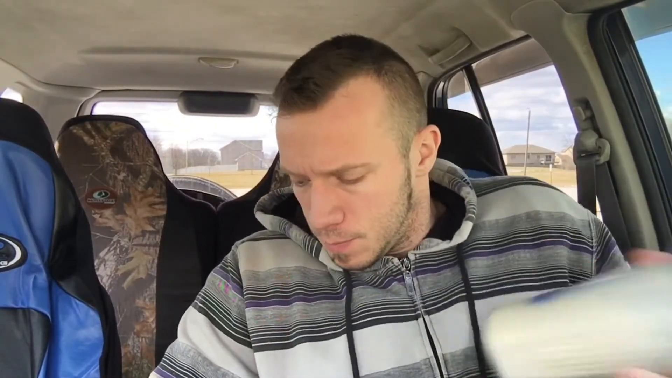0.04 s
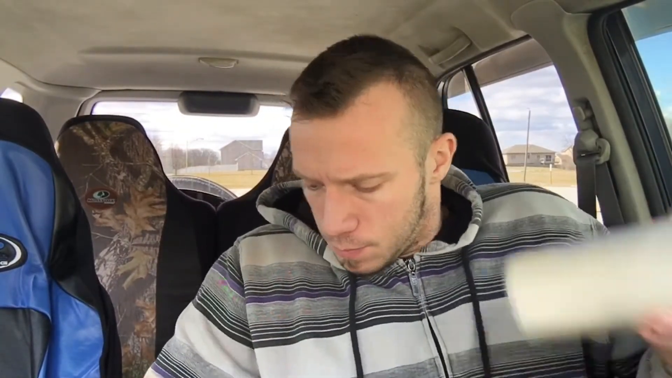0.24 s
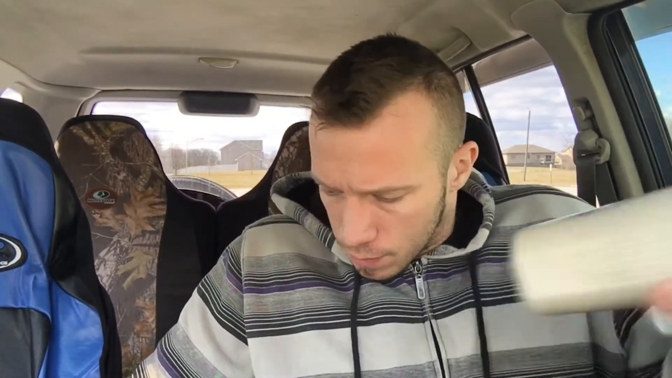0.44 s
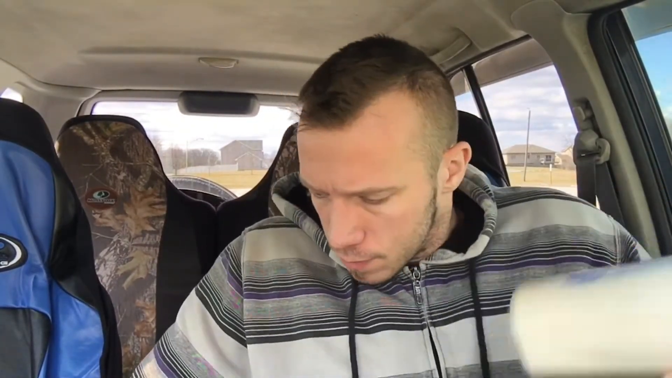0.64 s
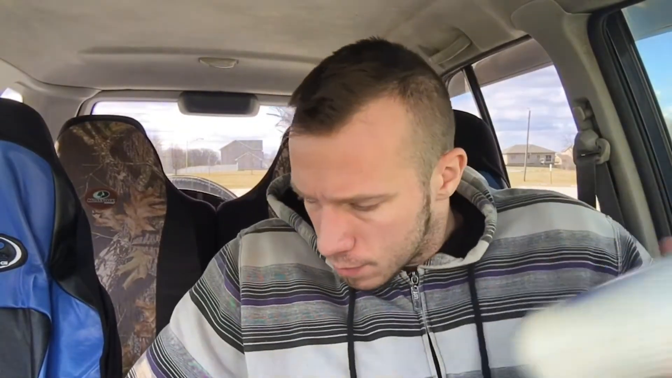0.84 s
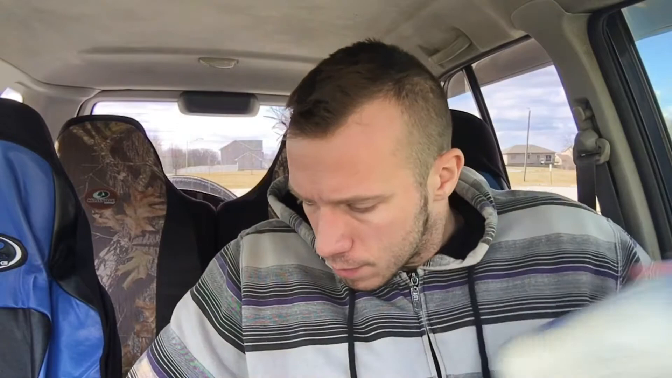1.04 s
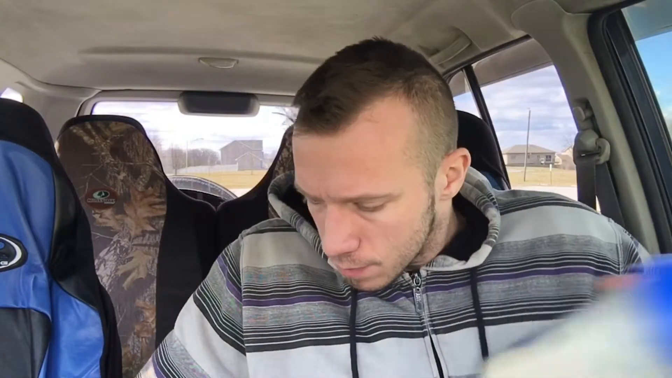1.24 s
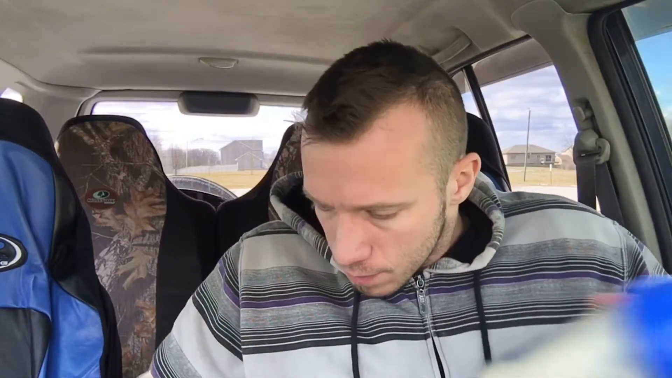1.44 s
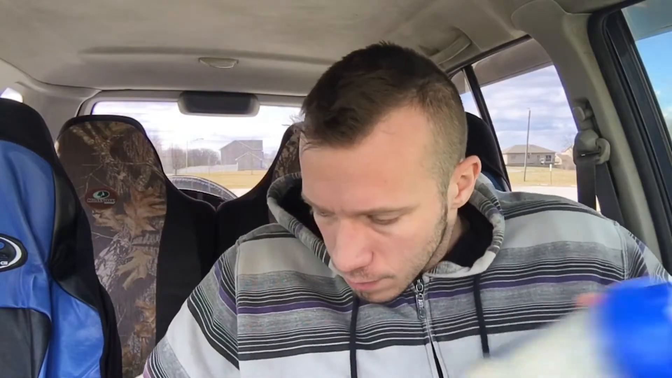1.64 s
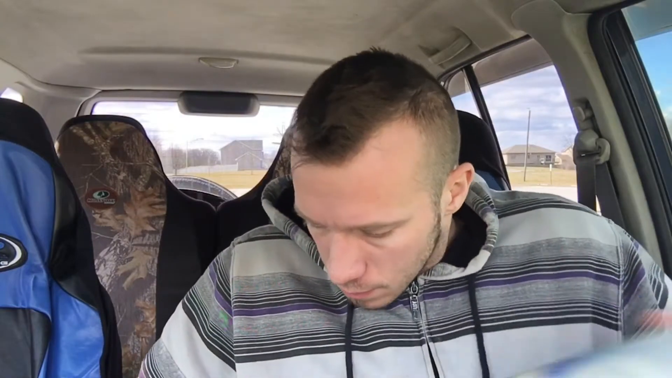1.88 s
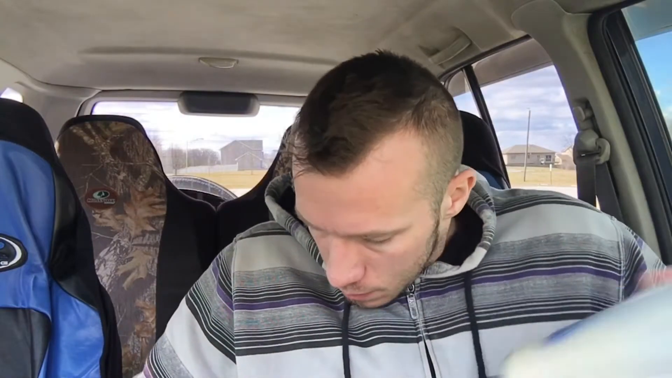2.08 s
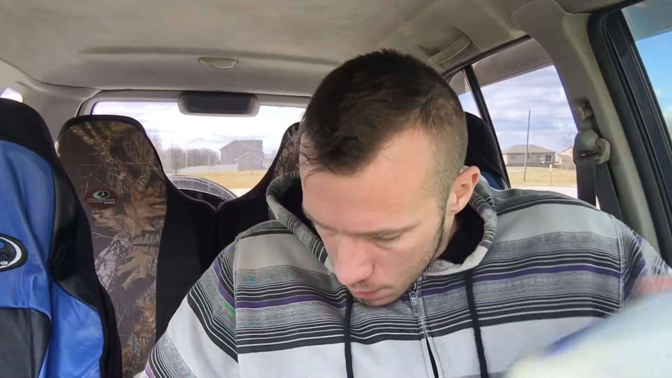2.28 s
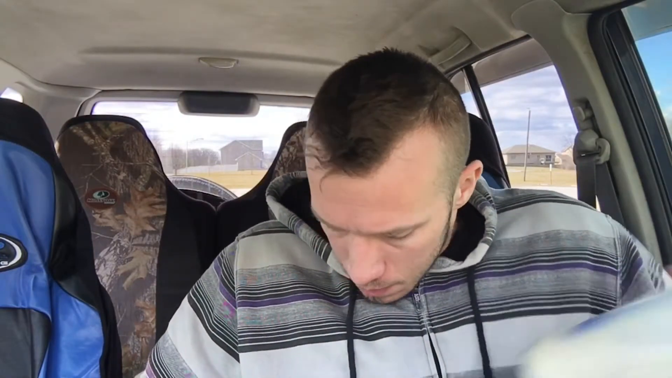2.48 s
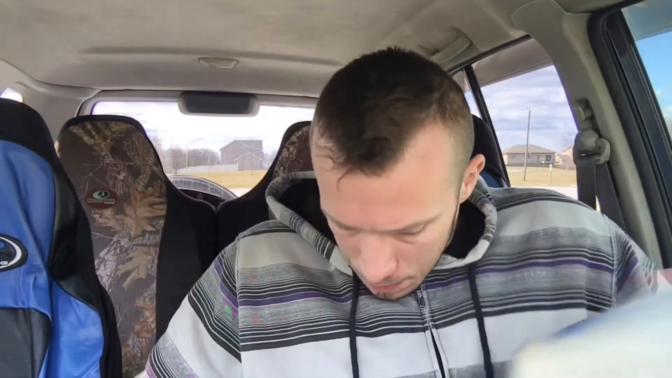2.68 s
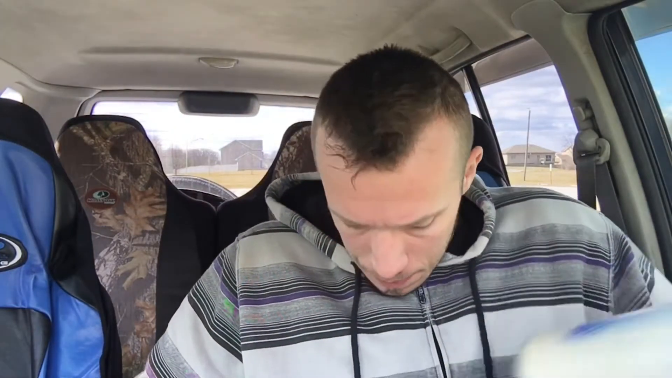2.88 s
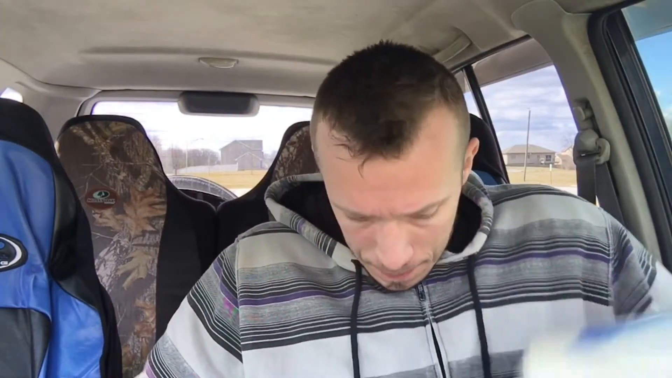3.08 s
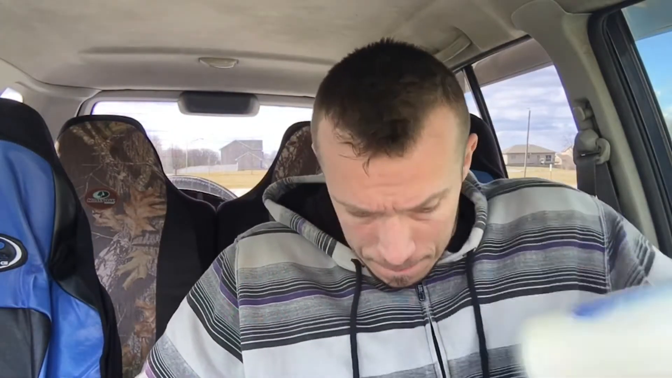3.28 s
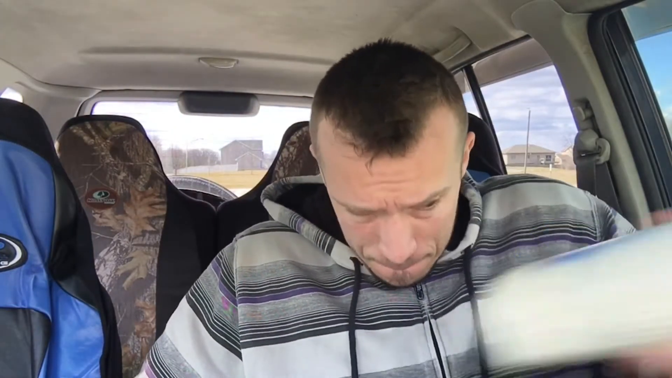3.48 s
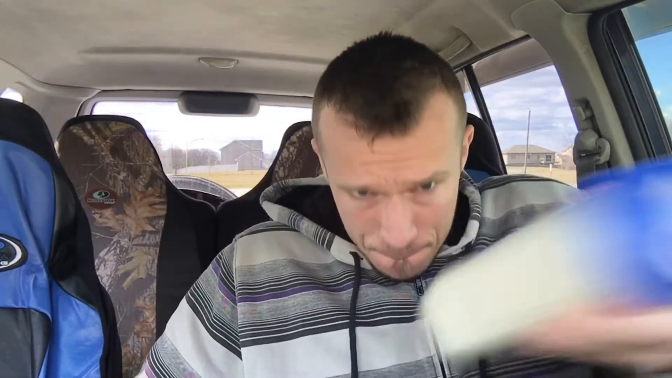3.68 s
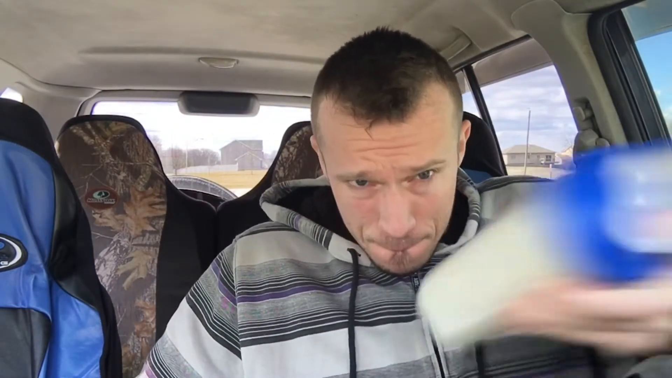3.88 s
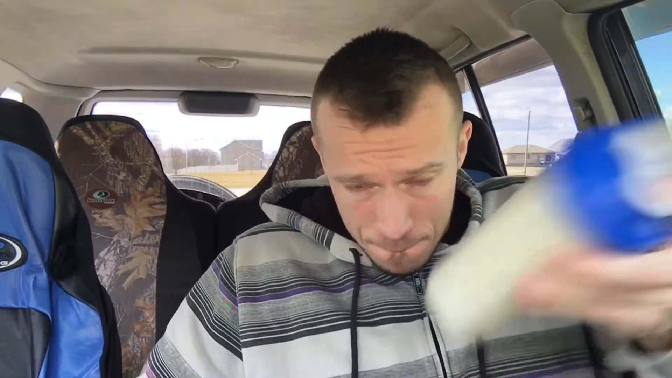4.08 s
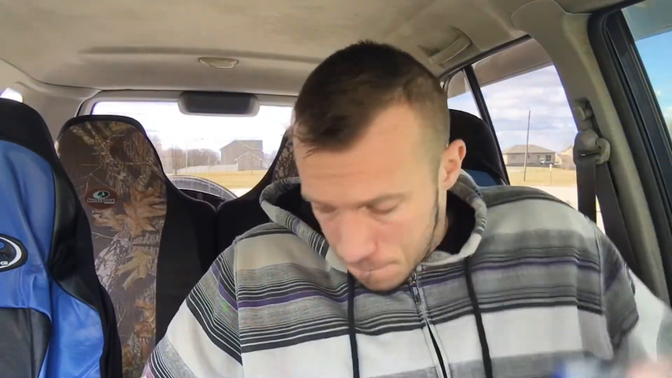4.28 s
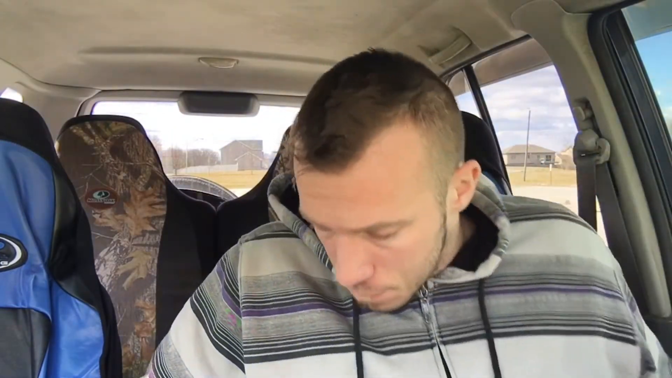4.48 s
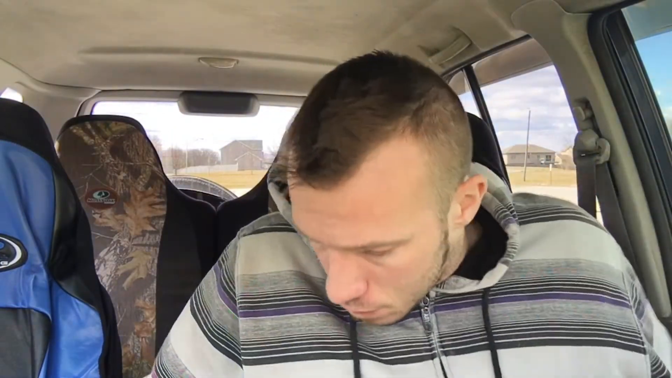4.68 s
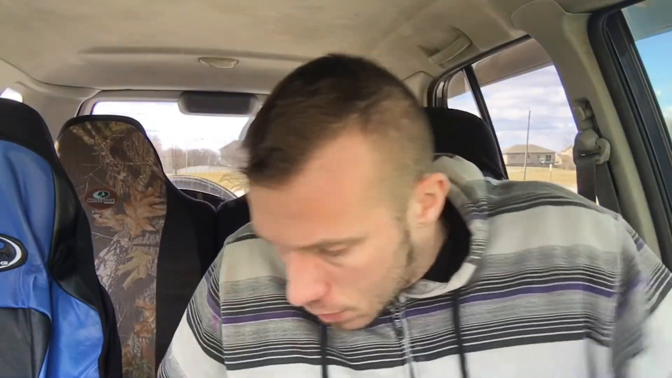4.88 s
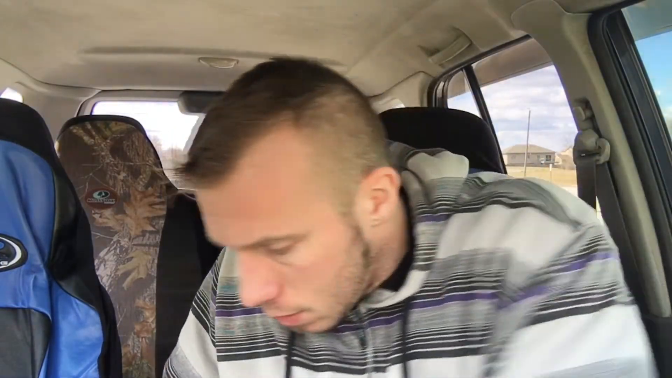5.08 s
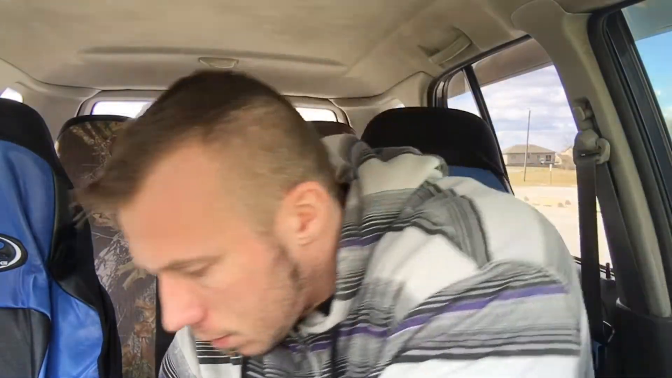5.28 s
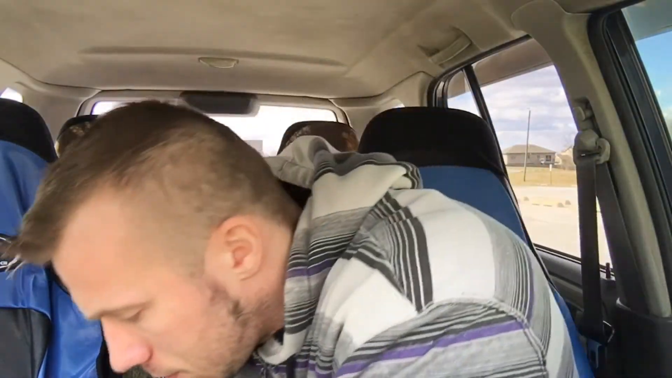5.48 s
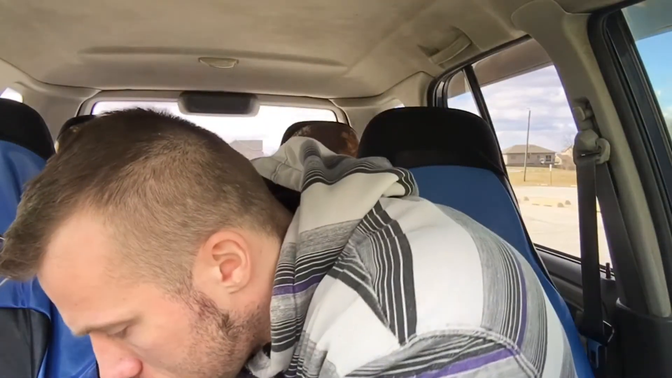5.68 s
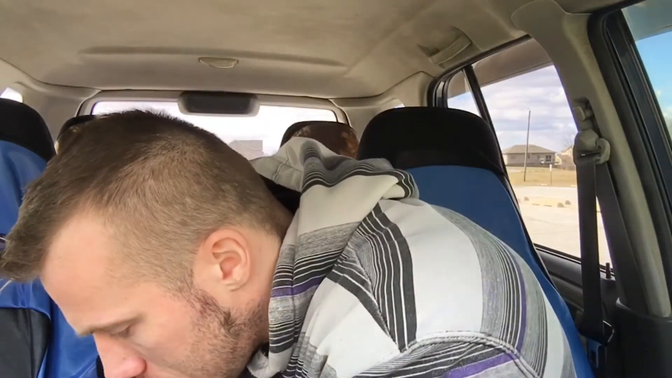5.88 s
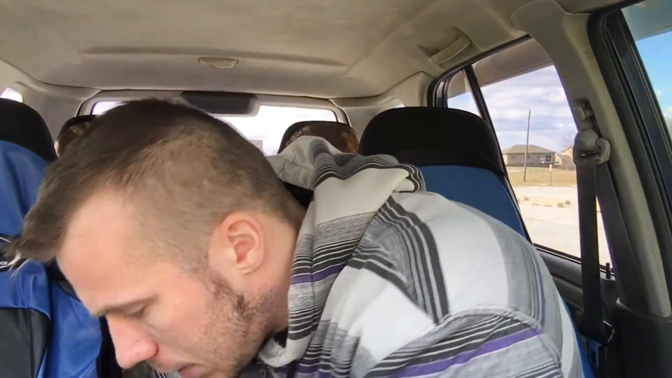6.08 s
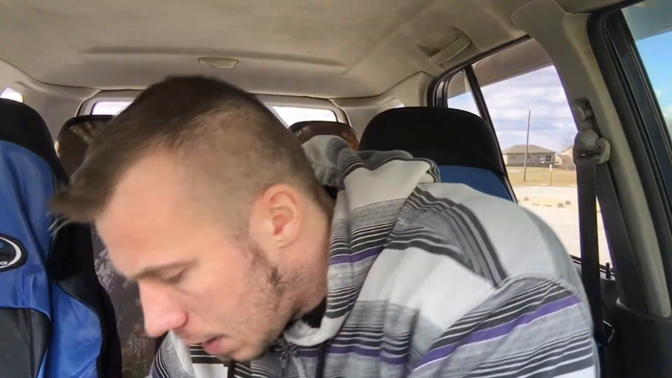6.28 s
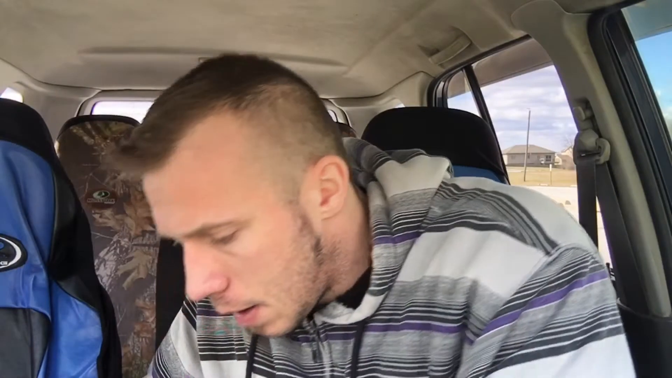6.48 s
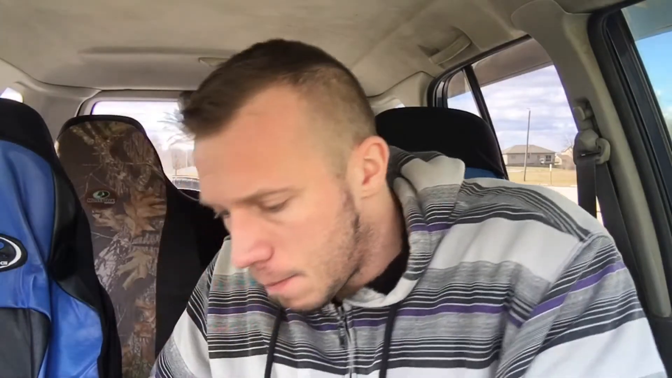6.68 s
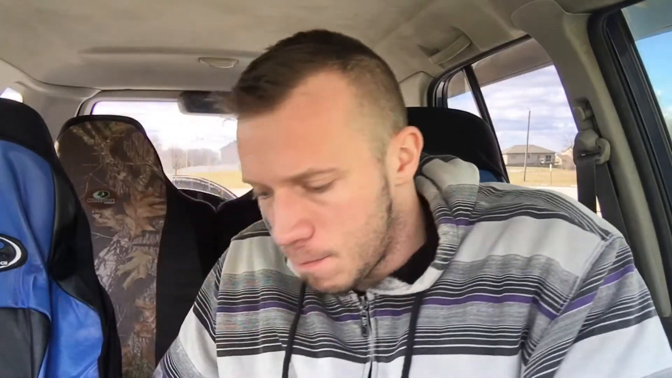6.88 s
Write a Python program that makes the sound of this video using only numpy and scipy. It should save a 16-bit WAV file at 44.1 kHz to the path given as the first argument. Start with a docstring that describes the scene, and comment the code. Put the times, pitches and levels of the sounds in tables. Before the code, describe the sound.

Close up inside a quiet parked car, a plastic bottle of thick drink is shaken vigorously about five times a second. A loose mixer piece clacks sharply against lid and base while liquid sprays, gurgles and slaps. After four seconds the shaking dies away, leaving soft seat rumble, a few tiny ticks and cloth rustling as a body shifts and leans, over a faint low cabin hum.

```python
"""A plastic shaker bottle is shaken about five times a second in a parked car; the shaking ends after four seconds.
A loose mixer piece strikes lid and base: noise bursts for the wall, decaying sines for the lid, light touches between.
The thick drink sloshes around it: noise spray, gurgling air pockets and pitched slaps.
The seat rumbles in low noise, loudest later under a shifting body; cloth rustles as grainy noise with
one resonance per rub, small hard things tick, and the cabin hums faintly throughout."""
import sys
import numpy as np
from scipy import signal
from scipy.io import wavfile
from scipy.ndimage import uniform_filter1d, minimum_filter1d

SR = 44100
rng = np.random.default_rng(int(sys.argv[2]) if len(sys.argv) > 2 else 0)


def to_wav(s):
    """Save 16-bit WAV."""
    ch = np.atleast_2d(s).T  # columns
    pcm = np.round(np.clip(ch, -1, 1) * 32767)  # PCM
    wavfile.write(sys.argv[1], SR, pcm.astype(np.int16))


N = 306054

# Vigour of the shaking, as the drink's spray. Each row: time in seconds, level in dB.
SHAKING = [(0, -38.5), (.3, -38.5), (.66, -45.5), (1.08, -41.5), (1.9, -42), (2.6, -42), (3.0, -39.5),
           (3.74, -41.5), (4.13, -41), (4.27, -51.5), (4.4, -76)]
# Colour of the struck bottle wall. Each row: frequency in Hz, relative level in dB per Hz.
WALL_COLOUR = [(240, -47.5), (500, -27.5), (1000, -16), (1700, -5), (2400, -2.5), (3300, -1.5), (4300, -3),
               (5000, -13), (6100, -17.5), (8000, -25.5), (10300, -33), (12000, -29.5), (16000, -38)]


def from_db(db):
    """Decibels to gain."""
    return 10 ** (np.asarray(db) / 20)


def rms_one(x):
    """Scale to rms 1."""
    return x / np.sqrt(np.mean(x ** 2) + 1e-20)


def in_time(rows):
    """Return an on/off gate that is open for the span of the table, then each column as a curve."""
    s, *columns = np.transpose(rows)
    t = np.arange(N) / SR
    gate = (t >= s[0]) & (t <= s[-1])
    return [gate] + [np.interp(t, s, column) for column in columns]


def at_hz(points, hz):
    """Spectrum level in dB, straight on a log-frequency axis."""
    point_hz, level_db = np.transpose(points)
    return np.interp(np.log(hz), np.log(point_hz), level_db)


def band(x, low, high):
    """Causal band-pass between two frequencies in Hz."""
    sos = signal.butter(2, [low, high], "band", fs=SR, output="sos")
    return signal.sosfilt(sos, x + 1e-18)


def drift(rate_hz):
    """Smooth chance with spread 1: noise through a two-pole low-pass, made at every 40th sample."""
    r = np.exp(-80 * np.pi * rate_hz / SR)
    noise = rng.standard_normal(N // 40 + 2002)
    slow = signal.lfilter([1], [1, -2 * r, r * r], noise)[2000:]   # drop the filter's start-up
    return np.interp(np.arange(N) / 40, np.arange(len(slow)), rms_one(slow))


def ring(x, hz, t60):
    """Two-pole resonator: a unit click sets off a dying sine of starting height 1."""
    r = from_db(-60 / (t60 * SR))
    w = 2 * np.pi * hz / SR
    return signal.lfilter([0, np.sin(w)], [1, -2 * r * np.cos(w), r * r], x + 1e-18)


def banded_noise(spectrum, patchy_db, grainy_db):
    """Third-octave bands of noise, lumpy in time, each also flickering by itself; rms 1."""
    edges_hz = 20 * 2 ** np.arange(0, 9.9, 1 / 3)
    out, together = 0, drift(25)
    grains = rng.standard_normal((2, N)) * from_db(grainy_db * drift(120))
    for k, (low, high) in enumerate(zip(edges_hz, edges_hz[1:])):
        level_db = at_hz(spectrum, np.sqrt(low * high))
        flicker_db = patchy_db * (0.27 * together + drift(4.7))
        out = out + from_db(level_db + flicker_db) * band(grains[k % 2], low, high)
    return rms_one(out)


def spray_level():
    """Gain of the spray: the vigour less the lulls, in which the drink hangs at one end of the bottle."""
    # Lulls that end when the drink is thrown back. Each row: time in seconds, depth in dB.
    lulls = [(0.23, 18), (.33, 9.5), (.43, 14), (.56, 3.5), (1.01, 1.5), (1.17, 13), (1.385, 13), (2.11, 7),
             (2.84, 11), (3.4, 3.5), (3.83, 4), (4.02, 5)]
    fall_s, rise_s = 0.032, .02   # each lull sinks more slowly than it recovers
    shaken, level_db = in_time(SHAKING)
    t = np.arange(N) / SR
    for s, depth_db in lulls:
        width_s = np.where(t < s, fall_s, rise_s)
        level_db = level_db - depth_db * np.exp(-((t - s) / width_s) ** 2)
    return shaken * from_db(level_db)


def gurgle():
    """Air pockets close at random and ring a few cycles, low and dull; rms 1."""
    sizes = from_db(4.6 * np.minimum(rng.exponential(1, N), 4)) * rng.choice([-1, 1], N)
    pockets_per_s = 260 * from_db(3.5 * drift(12))   # they come in clumps
    clicks = sizes * (rng.random(N) < pockets_per_s / SR)
    dealt = rng.integers(0, 16, N)   # which pitch each pocket takes
    rings = 0
    for k, hz in enumerate(np.geomspace(150, 1200, 16)):
        rings = rings + ring(clicks * (dealt == k), hz, t60=16.0 / hz) * (hz / 300) ** 0.11
    return rms_one(band(rings, 220, 1100))


def slosh(spray_gain):
    """The moving drink: noise spray with the gurgle under it, both following the spray gain."""
    # Colour of the spray. Each row: frequency in Hz, relative level in dB per Hz.
    spray_colour = [(290, -48), (500, -14), (586, -22), (1110, -5.5), (2650, 0), (4340, -11.5), (4940, -1),
                    (5970, -13.5), (16000, -32.5)]
    spray = banded_noise(spray_colour, patchy_db=2.5, grainy_db=2.0)
    return spray_gain * (spray + from_db(-5.0) * gurgle())


def seat_rumble():
    """Low noise with a frame resonance: the seat rocks under the shaking, then under the shifting body."""
    # Colour of the rumble. Each row: frequency in Hz, relative level in dB per Hz.
    seat_colour = [(15, -49), (25, -7.5), (64, -5.5), (108, -0.5), (165, -8.5), (326, -14.5), (573, -28.5),
                   (800, -26.5), (1040, -60), (1760, -120)]
    # The seat under the shifting body. Each row: time in seconds, level in dB.
    weight = [(4.4, -68.5), (4.55, -50), (4.72, -57.5), (4.8, -49), (5.05, -54), (5.35, -47.5),
              (5.62, -41.5), (5.8, -43.5), (5.85, -63.5), (6.05, -61), (6.2, -49.5), (6.4, -54.5),
              (6.94, -61.5)]
    shaken = in_time(SHAKING)[0]
    moves, weight_db = in_time(weight)
    seat = banded_noise(seat_colour, patchy_db=1.5, grainy_db=2.5)
    frame_boom = rms_one(ring(seat, 112, t60=0.48))
    seat = rms_one(seat + 0.45 * frame_boom)
    rumble = (moves * from_db(weight_db) + shaken * from_db(-63)) * seat
    low_rocking = shaken * from_db(-61.5) * rms_one(band(seat, 49, 70))
    return rumble + low_rocking


def cabin_hum():
    """Faint steady noise of the cabin, mostly low."""
    # Colour of the hum. Each row: frequency in Hz, relative level in dB per Hz.
    hum_colour = [(13, -35), (22, 3.5), (64, 5), (347, -4.5), (653, -12.5), (1710, -22), (4380, -36.5),
                  (5030, -31.5), (6100, -29), (14700, -38.5), (16000, -46)]
    return from_db(-57) * banded_noise(hum_colour, patchy_db=3.0, grainy_db=1.0)


def rattle(spray_gain, count):
    """Between blows the tumbling piece touches the wall lightly at random, harder when the spray is louder."""
    when, size = rng.random((count, 2)).T
    s = when * SHAKING[-1][0]
    spray_db = 20 * np.log10(spray_gain[(s * SR).astype(int)] + 1e-9)
    db = spray_db + 1 - 3 * np.log(size + .05)   # a few touches stand well out
    return wall(WALL_COLOUR, s, db, db - 7.5, db - 3, np.full(count, .025),
                hold_s=0.00023, scatter_db=3.5, sharpness=3.0)


def wall(colour, seconds, mid_db, low_db, high_db, t60s, hold_s, scatter_db, sharpness):
    """A blow shakes dense modes: a dying noise burst, cabin echoes included, coloured anew each time."""
    fine_hz = 500 * 2 ** np.arange(0, 5.2, 1 / 5)   # fifth-octave edges
    t = np.arange(SR // 8) / SR
    at = (seconds * SR).astype(int)
    white, out = rng.standard_normal((2, N + len(t))), np.zeros(N + len(t))
    chance = rng.standard_normal((len(at), len(fine_hz)))
    white[:, :N] *= rms_one(from_db(3.0 * drift(170)))   # the piece chatters: the burst comes in lumps
    first_flash = 0.31 * from_db(-60 * t / 0.0081)
    all_bands = list(enumerate(zip(fine_hz, fine_hz[1:])))
    for first, last, levels_db in [(400, 1900, low_db), (1900, 5000, mid_db), (5000, 19000, high_db)]:
        bands = [(k, lo, hi) for k, (lo, hi) in all_bands if first < np.sqrt(lo * hi) < last]
        share = np.array([from_db(at_hz(colour, np.sqrt(lo * hi))) for k, lo, hi in bands])
        # colour sets the balance inside each range, levels_db its total
        power = sum(gain ** 2 * (hi - lo) * 2 / SR for gain, (k, lo, hi) in zip(share, bands))
        for gain, (k, lo, hi) in zip(share / np.sqrt(power), bands):
            envelope, click = np.zeros((2, N + len(t)))
            sizes = from_db(levels_db + scatter_db * chance[:, k])
            band_t60s = t60s * (lo / 3000) ** -.3   # higher bands die sooner
            for i, size, t60 in zip(at, sizes, band_t60s):
                decay = from_db(-60 * np.maximum(t - hold_s, 0) / t60)
                envelope[i:i + len(t)] += size * (decay + first_flash)
            # first contact: one click; signs keep neighbouring bands in step
            click[at] = sharpness * sizes * (-1) ** k
            out += gain * band(envelope * white[k % 2] + click, lo, hi)
    return out[:N]


def lid_ring(seconds, rings_db, hold_s, lid_db):
    """The lid's modes ring; grip and wet plastic detune each a little from blow to blow."""
    # Lid modes. Each row: frequency in Hz, relative level in dB, t60 in seconds before a cap of 0.045 s.
    lid_modes = [(1669, -12.5, 0.062), (2246, -11, 0.061), (2527, -2, 0.11), (2604, 2.5, 0.039),
                 (3310, -16.5, .035), (4196, -13, 0.01), (6086, -8.5, 0.022)]
    t = np.arange(SR // 8) / SR
    at = (seconds * SR).astype(int)
    out = np.zeros(N + len(t))
    chance = rng.standard_normal((len(seconds), len(lid_modes), 2))
    for k, (hz, level_db, t60) in enumerate(lid_modes):
        decay = from_db(-60 * np.maximum(t - hold_s, 0) / min(t60, .045))
        swell = (1 - np.exp(-t / .0006)) * decay
        for i, ring_db, (size, detune) in zip(at, rings_db, chance[:, k]):
            gain = from_db(ring_db + level_db + lid_db + 2.5 * size)
            out[i:i + len(t)] += gain * swell * np.sin(2 * np.pi * hz * (1 + .011 * detune) * t)
    return band(out[:N], 1400, 6300)


def mixer():
    """Strength and place of a blow decide how much wall and lid it sets going."""
    # Mixer blows. Each row: time in seconds, strength in dB, nearness to the lid from 0 to 1,
    # t60 in seconds (at least 0.02 s is used, then scaled by frequency).
    blows = [(.034, -12, 0.8, 0.069), (.044, -18.5, 0.93, 0.066), (0.1134, -33, .3, .03),
             (.1229, -17.5, 0.1, 0.053), (0.164, -34, 0.3, 0.14), (0.253, -38, 0, 0.07),
             (0.286, -38, 0, 0.059), (0.3546, -32.5, 0, 0.13), (0.3868, -12.5, 0.92, 0.065),
             (.439, -38, 0, 0.026), (0.4857, -17, 0, 0.059), (0.516, -34, 0.83, 0.032),
             (0.5376, -29.5, 0.2, .12), (0.5845, -15, 0.88, 0.079), (0.6158, -25, 0.9, 0.082),
             (0.6404, -21.5, 0.27, 0.043), (.6517, -26.5, 0.4, 0.093), (0.6876, -23, 0, 0.064),
             (.723, -36, .1, 0.039), (0.7427, -30.5, 0.5, 0.14), (.7966, -11, 0.92, 0.055),
             (.806, -24, .5, 0.049), (0.82, -31.5, 0.6, 0.12), (0.8803, -23, 0.36, 0.035),
             (.902, -23, 0.2, 0.034), (0.9115, -31, 0.3, 0.049), (0.9319, -29.5, 0.3, .026),
             (0.9565, -35, 0.5, 0.039), (1.0246, -17, 1, 0.093), (1.0865, -29, .1, 0.087),
             (1.111, -31.5, 0.2, 0.047), (1.125, -23, 0.59, 0.072), (1.1809, -31, 0, 0.081),
             (1.2357, -16.5, 1, 0.096), (1.2613, -20, 0.3, 0.034), (1.305, -27.5, 0, 0.054),
             (1.3438, -23.5, 0.34, 0.06), (1.3992, -27.5, 0.5, .05), (1.4568, -18.5, 0.98, 0.13),
             (1.537, -27, 0, 0.027), (1.55, -11.5, 0.5, 0.056), (1.5833, -29.5, 0, 0.019),
             (1.604, -35.5, 0, .033), (1.6542, -11.5, 0.85, 0.084), (1.7319, -30, 0.3, 0.02),
             (1.74, -30, 0.1, 0.032), (1.758, -25, 0.33, 0.23), (1.8228, -29.5, 0.3, 0.045),
             (1.8662, -12, 0.87, 0.055), (1.875, -39, .1, 0.021), (1.938, -34, 0, 0.092),
             (1.9525, -12, 0.4, 0.053), (1.9987, -30, .5, 0.053), (2.0534, -13, 0.79, 0.075),
             (2.066, -17.5, 0.74, 0.013), (2.1425, -34.5, 0.73, 0.046), (2.1539, -10.5, 0.37, 0.046),
             (2.182, -28.5, 0.5, 0.091), (2.212, -28, 0, 0.075), (2.2518, -11, 0.88, 0.053),
             (2.2926, -32, 0.45, 0.092), (2.301, -32, 0.2, 0.041), (2.3572, -15.5, 0.6, 0.067),
             (2.3994, -25.5, 0, 0.041), (2.421, -31, 0.2, 0.028), (2.4576, -15.5, 1, 0.037),
             (2.463, -17.5, 0.94, 0.098), (2.5427, -13.5, .4, 0.077), (2.602, -22.5, 0.26, 0.038),
             (2.6163, -24, 0.5, 0.063), (2.6431, -9.5, 0.93, 0.062), (2.6671, -20.5, 0.66, 0.094),
             (2.71, -31, 0.6, 0.018), (2.715, -20.5, 0.32, 0.061), (2.7504, -20, 0.3, 0.079),
             (2.798, -37, 0, 0.24), (2.8174, -29, 0.2, .042), (2.8648, -28.5, 0.4, 0.088),
             (2.913, -19, .1, 0.066), (2.9489, -15.5, 0.22, 0.077), (2.996, -20.5, 0.1, .082),
             (3.0123, -34, .6, 0.035), (3.0381, -8, .8, 0.059), (3.123, -30, 0, 0.11),
             (3.1304, -19.5, 0.37, 0.075), (3.1547, -38, 0.4, 0.087), (3.1806, -30, 0.4, 0.038),
             (3.192, -30, 0.1, 0.076), (3.2316, -14.5, 0.9, .075), (3.2897, -31.5, 0.3, 0.038),
             (3.3025, -27, 0.4, 0.04), (3.3232, -12, 0.53, 0.043), (3.355, -30, 0.2, 0.11),
             (3.4138, -9, 0.86, 0.088), (3.4624, -29, 0.2, 0.025), (3.5034, -29.5, 0.3, 0.057),
             (3.5366, -25, 0.54, 0.027), (3.5623, -22, 0.4, 0.041), (3.6063, -29, 0.6, 0.034),
             (3.6765, -16, 0.42, 0.058), (3.699, -20, 0.4, 0.092), (3.729, -30, 0.05, 0.064),
             (3.7756, -11.5, 0.75, 0.068), (3.8429, -26, .3, 0.046), (3.8653, -11.5, 0, .087),
             (3.9137, -23, 0.1, 0.04), (3.957, -16, 0.95, 0.063), (3.985, -24.5, 0.36, 0.07),
             (4.0358, -29.5, 0.6, 0.19), (4.0613, -15.5, 0, 0.093), (4.0904, -33, 0.7, 0.092),
             (4.1156, -21.5, 0.4, 0.021), (4.1503, -18, 1, 0.082), (4.203, -29, 0, 0.041),
             (4.2253, -35.5, 0.4, 0.047), (4.2889, -30.5, 0, 0.064), (4.3352, -42, 0, 0.13),
             (4.357, -43.5, 0, 0.058), (4.4397, -48.5, 0.06, 0.15)]
    lows_at_base_db, lows_at_lid_db = -6.5, -23   # against strength: the base is the duller end
    ring_at_base_db, ring_at_lid_db = -14.5, 14   # against strength, ahead of the lid's own trim
    s, strength_db, lid, t60 = np.transpose(blows)
    lid = np.clip(lid, 0, 1)
    low_db = strength_db + lows_at_base_db + (lows_at_lid_db - lows_at_base_db) * lid ** 1.8
    high_db = -6 + 0.9 * strength_db   # the top grows a little less than the strength
    ring_db = strength_db + ring_at_base_db + (ring_at_lid_db - ring_at_base_db) * lid
    walls = wall(WALL_COLOUR, s, strength_db, low_db, high_db, np.maximum(t60, .02),
                 hold_s=0.00017, scatter_db=3.5, sharpness=3.6)
    return walls + lid_ring(s, ring_db, hold_s=0.0015, lid_db=-5.5)


def slaps():
    """Drink slaps a bottle end: a soft puff through the squeezed air pocket, its pitch rising as it closes."""
    # Slaps. Each row: time in seconds, peak in dB, starting pitch in Hz.
    slap_rows = [(0.035, -32, 665), (0.113, -37, 590), (0.265, -29.5, 560), (0.368, -35, 396),
                 (0.658, -29.5, 280), (0.762, -34, 575), (0.89, -30, 312), (1.081, -36, 636),
                 (1.179, -36, 580), (1.399, -33, 810), (1.533, -31.5, 400), (1.606, -31, 794),
                 (1.828, -32.5, 590), (1.911, -32.5, 308), (2.055, -39, 229), (2.124, -29, 325),
                 (2.355, -31.5, 530), (2.448, -39, 322), (2.523, -31, 356), (2.647, -35, 880),
                 (2.916, -25, 826), (3.038, -23.5, 620), (3.266, -44, 310), (3.32, -26.5, 360),
                 (3.413, -21.5, 903), (3.567, -37, 215), (3.646, -27, 610), (3.775, -32, 433),
                 (3.864, -29.5, 266), (4.062, -31, 890)]
    t = np.arange(SR // 10) / SR
    out = np.zeros(N + len(t))
    puffs = rng.standard_normal((len(slap_rows), len(t)))
    shape = t / 0.0055 * np.exp(1 - t / 0.0047)
    for (s, level_db, hz), puff in zip(slap_rows, puffs):
        rising = np.sin(2 * np.pi * hz * (t + 4.0 * t * t))
        slap = shape * (rising + 1.3 * rms_one(band(puff, hz * .6, hz * 2.2)))
        i = int(s * SR)
        out[i:i + len(t)] += from_db(level_db) * slap / np.abs(slap).max()
    return out[:N]


def fold_resonance(x, centre_hz, width_hz):
    """A resonance that keeps one pitch per rub and steps to another at the next; rms 1."""
    out, state = np.zeros(N), np.zeros(2)
    r = np.exp(-np.pi * width_hz / SR)
    for i in range(0, N, 256):   # the pitch is read once per block
        a = [1, -2 * r * np.cos(2 * np.pi * centre_hz[i] / SR), r * r]
        out[i:i + 256], state = signal.lfilter([1, 0, -1], a, x[i:i + 256], zi=state)
    return rms_one(out)


def rustle():
    """Grainy cloth friction; each rub swells, holds and fades, and the loudest fold lends a resonance."""
    # Colour of the cloth. Each row: frequency in Hz, relative level in dB per Hz.
    cloth_colour = [(290, -50), (500, -21), (1020, -6.5), (1510, -2), (2360, -4.5), (2650, -4),
                    (3290, -3.5), (4340, -11), (4870, -7), (16000, -36)]
    # Rubbing folds. Each row: start of the hold in seconds, length of the hold in seconds, level in dB,
    # fold resonance in Hz, share of the resonance (gain against the plain cloth).
    rub_rows = [(4.746, 0.16, -65, 1090, 1.6), (4.988, 0.18, -71, 1466, 2.8), (5.147, .1, -71, 1560, 1.2),
                (5.897, 0.053, -62.5, 3000, .4), (5.993, .04, -59, 2890, 1.2),
                (6.046, 0.038, -65, 2800, 1.2), (6.078, .025, -53, 2880, 1.1),
                (6.119, .05, -54.5, 2630, 1.1), (6.172, 0.041, -53.5, 1950, 0.63),
                (6.272, .06, -57.5, 2640, .7), (6.341, 0.25, -70, 4290, 2.1)]
    rise_s, fade_s = 0.0086, 0.022   # ahead of the hold and after it
    start, length, level_db, fold_hz, share = np.transpose(rub_rows)[:, :, None]
    t = np.arange(N) / SR
    ramp = np.minimum((t - start) / rise_s, (start + length - t) / fade_s) + 1
    rubs = from_db(level_db) * np.clip(ramp, 0, 1) ** 2
    loudest = rubs.argmax(axis=0)
    cloth = banded_noise(cloth_colour, patchy_db=2.0, grainy_db=2.0)
    folds = cloth + share[loudest, 0] * fold_resonance(cloth, fold_hz[loudest, 0], width_hz=150)
    stirring = (t > 3.6) * from_db(-63.5) * cloth   # faint, under and between the rubs
    return rubs.max(axis=0) * folds + stirring


def handling():
    """Small hard things tick: short noise bursts with a softer first click than the blows."""
    # Ticks. Each row: time in seconds, strength in dB, dullness as lows over mids in dB.
    ticks = [(4.594, -65.5, 13), (4.625, -57.5, 4), (4.896, -55, 0), (5.503, -56.5, 7.5),
             (5.623, -71.5, 15), (5.653, -65, 10), (5.759, -50.5, -2.5), (5.887, -58, -4), (5.997, -49, -8),
             (6.013, -47, -8), (6.078, -37, -10.5), (6.124, -52, -16), (6.2, -63, 13), (6.241, -46, -22),
             (6.254, -47, 2), (6.285, -50, -19), (6.325, -49, -15), (6.454, -46.5, -8.5), (6.838, -64, 7)]
    # Colour of the handled things. Each row: frequency in Hz, relative level in dB per Hz.
    handled_colour = [(500, -8.5), (900, -3.5), (1500, -3), (2800, 1), (4500, -7), (8000, -23),
                      (16000, -37)]
    s, strength_db, dull_db = np.transpose(ticks)
    return wall(handled_colour, s, strength_db, strength_db + dull_db, strength_db - 9,
                np.full(len(s), 0.049), hold_s=0.0031, scatter_db=2.0, sharpness=1.2)


def scene():
    """Sum bottle, drink, moving body and cabin into one channel."""
    spray_gain = spray_level()
    drink = slosh(spray_gain) + slaps()
    bottle = mixer() + rattle(spray_gain, count=150)
    body = seat_rumble() + rustle()
    return (bottle + drink + body + handling() + cabin_hum())[None]


def record(dry):
    """A fast limiter holds peaks at full scale, then a steep low-pass cuts the top."""
    room_left = minimum_filter1d(1 / np.maximum(np.abs(dry), 1), size=45)   # about 1 ms
    held = dry * uniform_filter1d(room_left, size=45)
    low_pass = signal.cheby2(16, 90, 16700, fs=SR, output="sos")   # stop band from 16.7 kHz, 90 dB down
    return np.clip(signal.sosfilt(low_pass, held), -1, 1)


dry = scene()
out = record(dry)
to_wav(out)
```